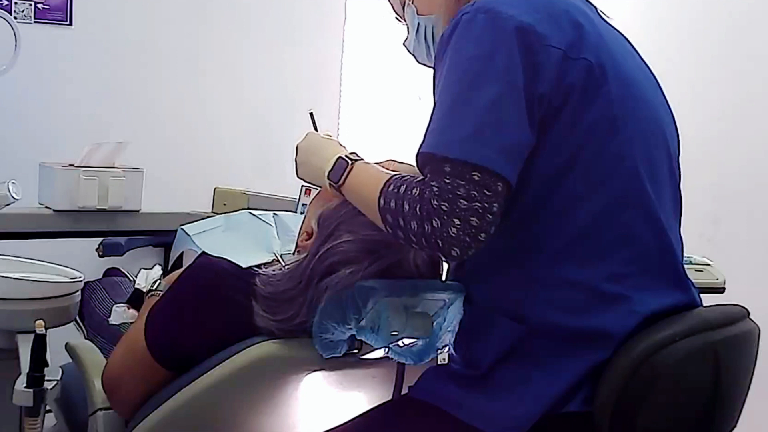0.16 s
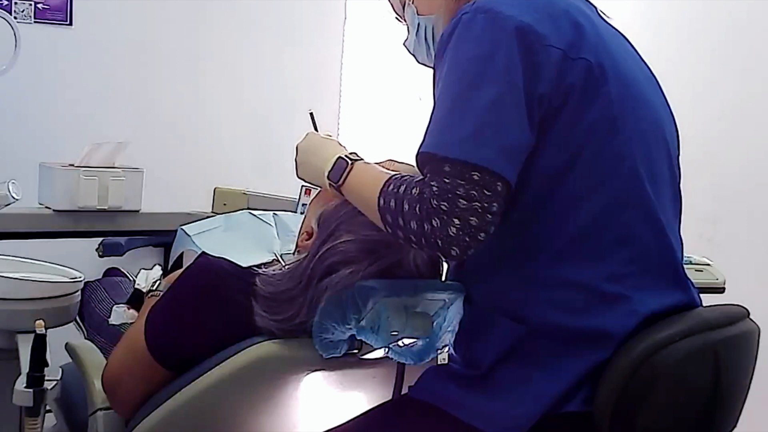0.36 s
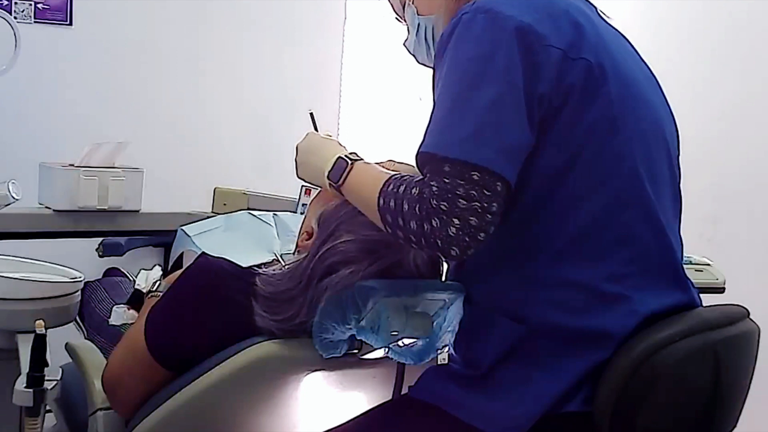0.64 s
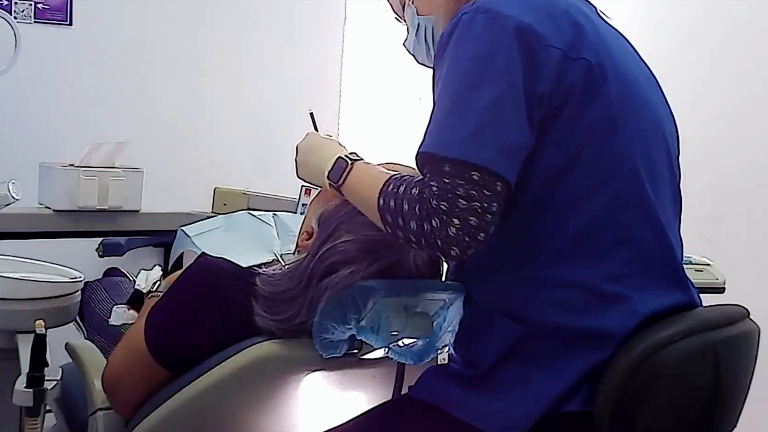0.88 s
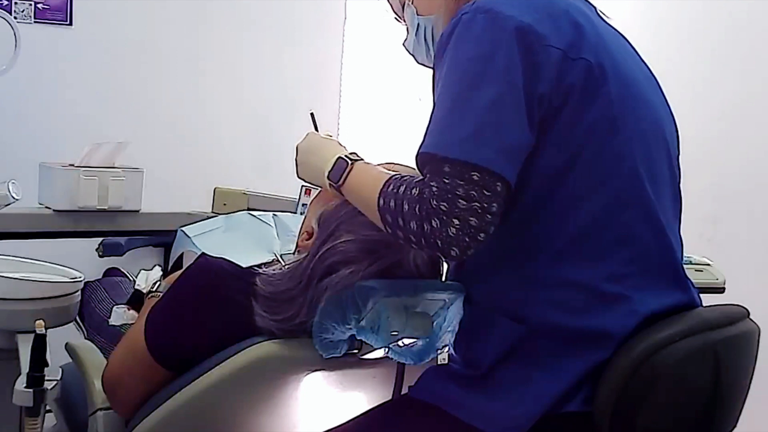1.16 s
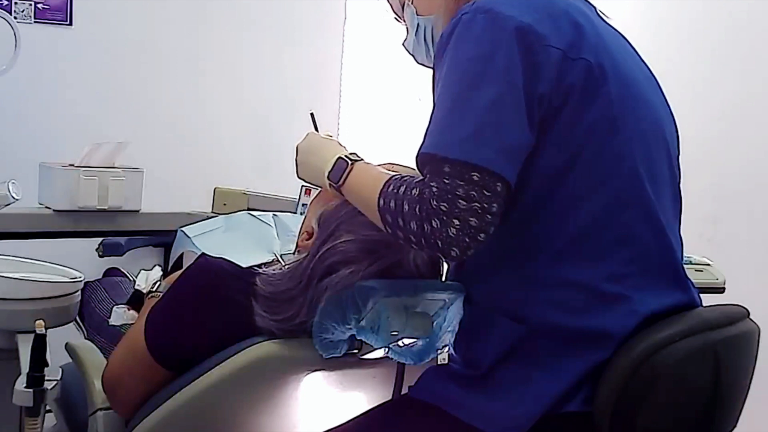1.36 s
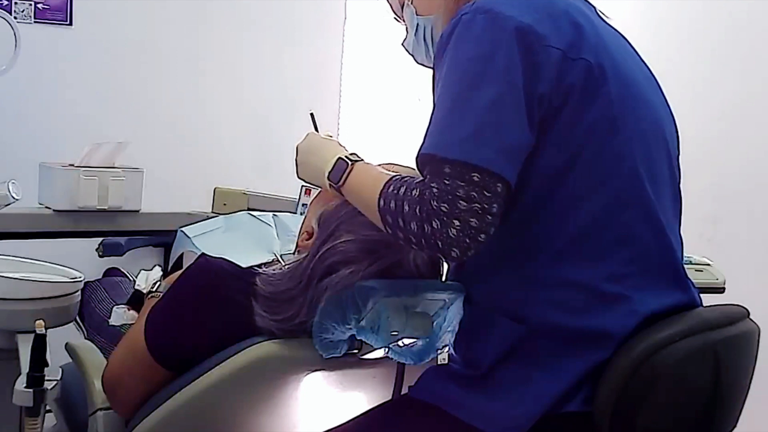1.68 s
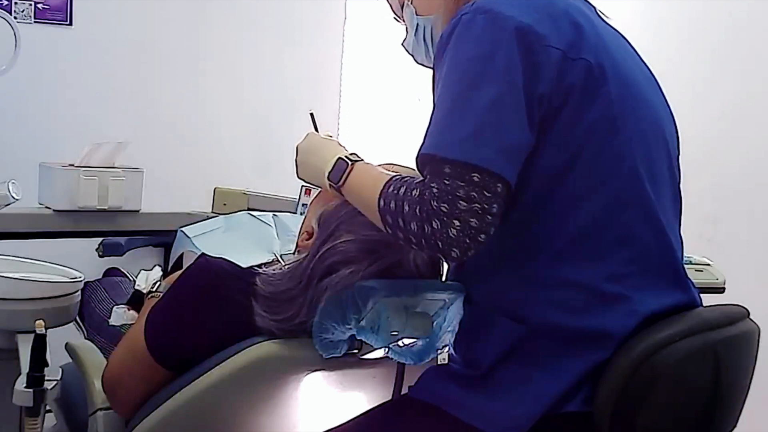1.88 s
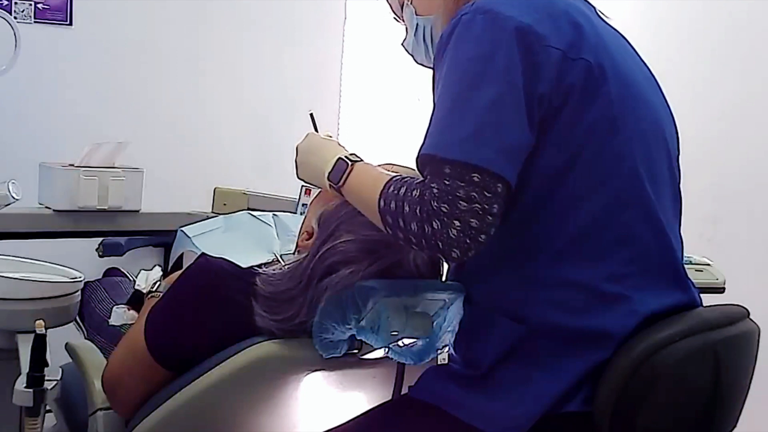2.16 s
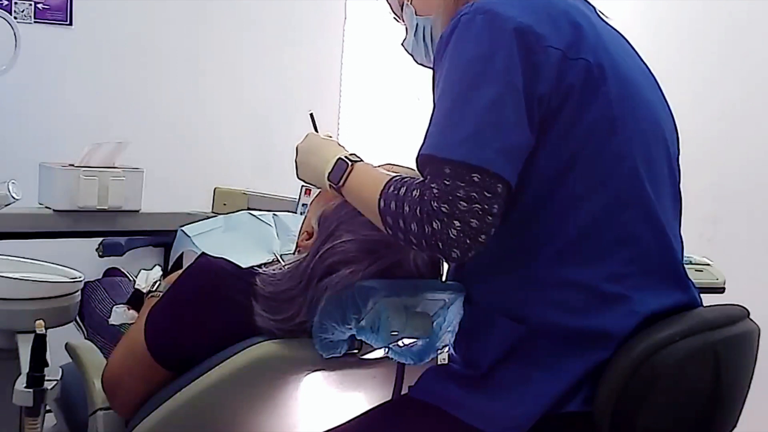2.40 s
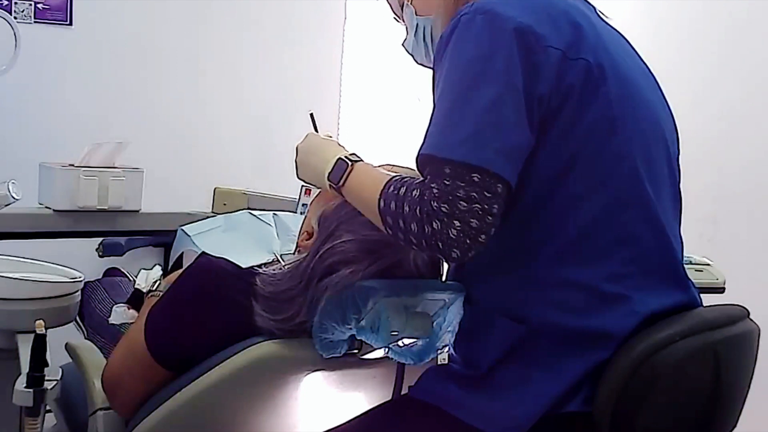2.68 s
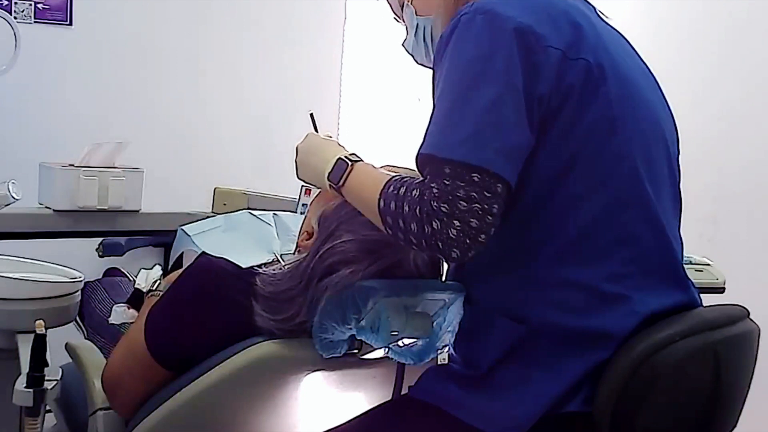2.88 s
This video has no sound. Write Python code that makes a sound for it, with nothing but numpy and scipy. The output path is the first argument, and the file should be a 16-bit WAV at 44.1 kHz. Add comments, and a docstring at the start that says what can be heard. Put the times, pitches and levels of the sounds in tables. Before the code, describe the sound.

Dental suction draws air and spray with a bright hiss, whistling at first and surging briefly. Then a scaler's steely sizzling comes in quick bursts, with faint wet slurps. Equipment hums softly in the small treatment room.

```python
"""A suction tube hisses on air and spray, with a few breathy whistles: a dental cleaning in a small,
quiet clinic room. The open mouth colours the draught with a hollow, shifting resonance, and water
slurps into the tube. The powered scaler sizzles each time its wet steel tip touches a tooth.
Equipment hums underneath."""
import sys
import numpy as np
from scipy import signal
from scipy.fft import rfft, irfft, next_fast_len
from scipy.io import wavfile
from scipy.ndimage import uniform_filter1d, map_coordinates

SR = 44100
rng = np.random.default_rng(int(sys.argv[2]) if len(sys.argv) > 2 else 0)


def output_pcm(signal):
    """Save a mono or channel-first signal as 16-bit PCM at the path in sys.argv[1].

    Samples are clipped to [-1, 1] before scaling.
    """
    pcm = np.clip(np.atleast_2d(signal).T, -1, 1) * 32767
    wavfile.write(sys.argv[1], SR, np.round(pcm).astype(np.int16))


N = 134064


def amp(db):
    """Decibels to gain."""
    return 10 ** (np.asarray(db) / 20)


def unit(x):
    """Scale to rms 1."""
    return x / np.sqrt(np.mean(x ** 2) + 1e-20)


def along(points, hz):
    """Read a curve of (Hz, value) points on a log frequency axis."""
    freqs, values = np.transpose(points)
    return np.interp(np.log(hz + 1), np.log(freqs + 1), values)


def curves(rows):
    """One value per sample for each column after the time."""
    times, *columns = np.transpose(rows)
    return [np.interp(np.arange(N) / SR, times, column) for column in columns]


def wobble(rate):
    """A smooth random curve, rate knots a second."""
    knots = rng.standard_normal(int(N * rate / SR) + 4)
    return map_coordinates(knots, [np.arange(N) * rate / SR])


def filtered(x, response):
    """Shape x with a gain that depends on frequency."""
    size = next_fast_len(N + SR // 2)
    return irfft(rfft(x, size) * response(np.fft.rfftfreq(size, 1 / SR)), size)[..., :N]


def coloured(x, spectrum):
    """x through an EQ curve of (Hz, dB) points, at rms 1."""
    return unit(filtered(x, lambda hz: amp(along(spectrum, hz))))


def resonate(x, modes):
    """x through steep-sided (Hz, width, dB) resonances, at rms 1."""
    def gain(hz):
        return np.sqrt(sum(amp(db) ** 2 / (1 + 2 * ((hz - centre) / width) ** 2) ** 3
                           for centre, width, db in modes))
    return unit(filtered(x, gain))


def stereo_noise(alike):
    """White noise, partly shared between left and right."""
    mid, side = rng.standard_normal((2, N))
    angle = np.arccos(np.clip(alike, -1, 1)) / 2
    mid, side = np.cos(angle) * mid, np.sin(angle) * side
    return np.array([mid + side, mid - side])


def pan(left_db):
    """Gains of the two sides for a left-minus-right level."""
    return amp(np.array([[left_db], [-left_db]]) / 2)


def impacts(per_s, scatter_db):
    """Tiny impacts at random times and of random size."""
    hits = rng.random(N) < per_s / SR
    return unit(hits * rng.standard_normal(N) * amp(scatter_db * rng.standard_normal(N)))


def strokes(rows, attack_s, release_s):
    """Attack, hold and release for each (start, length, dB) row."""
    t = np.arange(N) / SR
    power = np.zeros(N)
    for start, length, db in rows:
        attack = np.clip((t - start) / attack_s, 0, 1)
        release = np.exp(-np.maximum(t - start - length, 0) / release_s)
        power += (amp(db) * attack * release) ** 2
    return np.sqrt(power)


def swells(rows):
    """A rounded rise and fall for each (peak time, rise, fall, dB) row."""
    t = np.arange(N) / SR
    power = np.zeros(N)
    for peak, rise, fall, db in rows:
        distance = (t - peak) / np.where(t < peak, rise, fall)
        power += (amp(db) / (1 + distance ** 2 / 2) ** 2) ** 2
    return np.sqrt(power)


def room(x, wet_db, t60_s=0.3):
    """Direct sound and the short answer of the walls, different on each side."""
    t = np.arange(SR // 3) / SR
    tail = rng.standard_normal((2, len(t))) * amp(-60 * t / t60_s)
    wet = signal.fftconvolve(x[None], tail / np.linalg.norm(tail[0]), axes=1)[:, :N]
    return (x + amp(wet_db) * wet) / np.hypot(1, amp(wet_db))


def turbulence(wet_db, diffuse_db):
    """Rushing air from one spot, combed by the walls, plus a diffuse share."""
    return unit(room(rng.standard_normal(N), wet_db) + amp(diffuse_db) * stereo_noise(alike=0))


# Bass-heavy room tone. Each row: frequency in Hz, EQ gain in dB.
ROOM_TONE_EQ = [(10, 1), (30, 0.5), (46, 6), (65, 2), (100, -7), (170, -13), (330, -16.5), (600, -22),
                (1200, -25), (2300, -27), (6000, -31.5), (15000, -52)]
# Its stereo image. Each row: frequency in Hz, left-right likeness from 0 (wide) to 1 (mono).
ROOM_ALIKE = [(50, 1), (90, 0.6), (170, 0.19), (400, 0.57), (1000, 0), (3000, 0)]
# Equipment hum. Each row: pitch in Hz, level in dB.
HUM_TONES = [(48.3, -61.5), (398.4, -85)]


def equipment():
    """A wavering low hum in the steady rumble and air of the room."""
    def mid_side_gains(hz):
        angle = np.arccos(np.clip(along(ROOM_ALIKE, hz), -1, 1)) / 2
        return np.array([np.cos(angle), np.sin(angle)])
    mid, side = filtered(rng.standard_normal((2, N)), mid_side_gains)
    air = amp(-56) * coloured(np.array([mid + side, mid - side]), ROOM_TONE_EQ)
    t = np.arange(N) / SR
    hum = sum(amp(db + 1.8 * wobble(9.25)) * unit(np.sin(2 * np.pi * hz * t + 0.58 * wobble(6.4)))
              for hz, db in HUM_TONES)
    return air * pan(left_db=-0.45) + hum * pan(left_db=8.5)


# A late low swell. Each row: start in seconds, length in seconds, level in dB.
RUMBLE_CUES = [(2.8, 0.32, -58.5)]
# Its dark colour. Each row: frequency in Hz, EQ gain in dB.
RUMBLE_EQ = [(40, -21), (70, 5), (100, -5), (140, -5), (200, -23), (350, -18.5), (800, -53)]


def rumble():
    """A dull, low rumble rises softly in the room."""
    low_noise = coloured(stereo_noise(alike=0.82), RUMBLE_EQ)
    return low_noise * strokes(RUMBLE_CUES, attack_s=0.03, release_s=0.05)


def whine(hz=14425, width_hz=36, level_db=-69.5):
    """The scaler's thin, faint whine flutters inside the spray."""
    tone = resonate(turbulence(wet_db=-2, diffuse_db=-9), [(hz, width_hz, 0)])
    return tone * amp(level_db + 2 * wobble(17))


# Gulps of water. Each row: peak time, rise and fall in seconds, peak level in dB.
SLURPS = [(.53, 0.043, 0.05, -69), (.72, 0.043, 0.042, -67.5), (2.53, 0.055, 0.063, -61.5),
          (2.93, 0.023, 0.037, -62), (3.01, 0.032, 0.044, -60)]
# Their wet ring. Each row: centre and width in Hz, gain in dB.
SLURP_MODES = [(2950, 490, 6), (3270, 430, 8.5), (4360, 2400, -0.5)]


def slurps():
    """Bubbles burst at the mouth of the tube as it meets water."""
    bubbles = room(impacts(per_s=1800, scatter_db=-1), wet_db=4.5)
    return resonate(bubbles, SLURP_MODES) * swells(SLURPS) * pan(left_db=-4.5)


# Thin, high squeals. Each row: start and length in seconds, pitch and width in Hz, level in dB.
SQUEALS = [(0, 0.063, 14450, 110, -51.5), (0.145, 0.37, 10400, 350, -59.5), (.58, 0.19, 14000, 600, -59),
           (0.967, 0.2, 14130, 55, -64), (0.985, 0.23, 9320, 260, -59), (1.087, 0.21, 15500, 110, -60.5),
           (1.1, 0.12, 13250, 120, -61.5), (1.283, .13, 14300, 600, -59), (1.388, .22, 9280, 219.8, -62),
           (1.45, 0.21, 15500, 220, -64.5), (1.48, .16, 13420, 130, -67), (1.855, 0.23, 9270, 350, -68),
           (2.582, 0.084, 9460, 250, -63)]


def squeals():
    """Narrow, fluttering squeals come and go in the spray."""
    out = np.zeros((2, N))
    for start, length, hz, width, db in SQUEALS:
        band = resonate(turbulence(wet_db=3, diffuse_db=-14), [(hz, width, 0)])
        flutter = amp(2.4 * wobble(39.85))
        out += band * flutter * strokes([(start, length, db)], attack_s=0.02, release_s=0.021)
    return out * pan(left_db=0.5)


TUBE_NOTE_HZ = 1108
# Breathy whistles in the draught. Each row: start in seconds, length in seconds, level in dB.
WHISTLES = [(.045, 0.06, -59), (.165, 0.048, -62.5), (.275, 0.051, -56.5), (.395, 0.048, -57.5)]


def whistles(jitter_hz=10.7):
    """The tube's note breaks into short, rough whistles."""
    phase = 2 * np.pi * np.cumsum(TUBE_NOTE_HZ + jitter_hz * wobble(200)) / SR
    tone = unit(np.sin(phase) * amp(2.4 * wobble(189.7)))
    return tone * strokes(WHISTLES, attack_s=0.0099, release_s=0.029)


# Fader moves for the draught, before the surge and from the surge on.
# Each row: time in seconds, relative levels of the low and of the upper resonances in dB.
DRAUGHT_EARLY = [(0.0, -58.5, -56.5), (0.106, -64.5, -66), (0.16, -72, -74), (0.276, -63.5, -70),
                 (0.488, -68.5, -66.5), (0.598, -75.5, -93), (0.714, -82, -105), (0.724, -76, -88),
                 (0.785, -74, -68)]
DRAUGHT_LATE = [(0.81, -62.5, -58.5), (1.19, -66, -69), (1.25, -70, -72), (1.27, -70.5, -65.5),
                (1.95, -72.5, -69), (2.01, -84, -70.5), (2.04, -74, -66.5), (2.39, -79, -74),
                (2.52, -74.5, -70.5), (2.8, -76, -72.5), (3.0, -90, -67.5), (3.04, -79, -73)]
# The mouth's low resonance. Each row: time in seconds, centre and width in Hz.
MOUTH_SWEEP = [(0, 1061, 240), (.3, 1130, 230.1), (.55, 1174, 189.9), (.82, 1336, 125), (.97, 1371, 160),
               (1.15, 1410, 195.1), (1.3, 1298, 85), (1.55, 1245, 90.02), (1.75, 1193, 100),
               (1.92, 1230, 90.02), (2.2, 1210, 105), (2.68, 1260, 99.98), (3.04, 1277, 120)]
# Hollow upper resonances of mouth and tube. Each row: centre and width in Hz, gain in dB.
HOLLOW_MODES = [(3200, 140, -8), (3713, 336, -1), (4646, 300, -5), (5930, 85, -9)]


def mouth(gurgle_db=1.7, gurgle_per_s=110):
    """The draught gurgles in the cavity of the mouth, whose resonance shifts and narrows."""
    low_db, upper_db = curves(np.vstack([DRAUGHT_EARLY, DRAUGHT_LATE]))
    centre_hz, width_hz = curves(MOUTH_SWEEP)
    mean_width = width_hz.mean()
    band = filtered(rng.standard_normal((2, N)), lambda hz: 1 / (1 + (hz / mean_width) ** 2) ** 0.8)
    clock = np.cumsum(width_hz) / mean_width  # slower noise makes a narrower band
    cos_part, sin_part = [np.interp(clock, np.arange(N), noise) for noise in band]
    phase = 2 * np.pi * np.cumsum(centre_hz) / SR
    cavity = cos_part * np.cos(phase) + sin_part * np.sin(phase)
    gurgle = cavity * amp(gurgle_db * wobble(gurgle_per_s))
    low = unit(room(gurgle, wet_db=3)) * amp(low_db + 2.5)
    tube_note = resonate(turbulence(wet_db=-1.5, diffuse_db=-23), [(TUBE_NOTE_HZ, 25, 0)])
    flutter_db = 2 * wobble(170)
    hollow = resonate(turbulence(wet_db=14.5, diffuse_db=-20), HOLLOW_MODES)
    upper = hollow * amp(upper_db - 2 + flutter_db) * pan(left_db=-8.5)
    return low + tube_note * amp(low_db - 8.5) + upper


# Pulls of strong suction. Each row: peak time, rise and fall in seconds, peak level in dB.
SURGES = [(.86, 0.041, 0.058, -58.5), (1.1, 0.08, 0.11, -60)]
# Their broad colour. Each row: centre and width in Hz, gain in dB.
SURGE_MODES = [(795, 580, -12), (3520, 390, 6.5), (4260, 290, 3), (6170, 1500, 4)]


def surge():
    """The tube draws harder for a moment, with a broad rush."""
    rush = resonate(turbulence(wet_db=12, diffuse_db=-16), SURGE_MODES)
    return rush * swells(SURGES) * pan(left_db=-14.5)


# Opening jets of spray. Each row: peak time, rise and fall in seconds, peak level in dB.
JETS = [(.05, 0.12, 0.11, -55.5), (.3, 0.088, 0.12, -59.5)]
# Their bite. Each row: centre and width in Hz, gain in dB.
JET_MODES = [(3910, 170, 2), (4300, 330, -2.5), (4750, 110, -1.5), (5260, 100, -6), (5970, 200, -1.5),
             (9560, 420, 4.5)]


def jets():
    """Spray rushes into the tube with a biting edge."""
    spray = resonate(turbulence(wet_db=6, diffuse_db=-12), JET_MODES)
    return spray * swells(JETS) * pan(left_db=-9)


# Fader moves for the tube's hiss and the finest mist. Each row: time in seconds, relative level in dB.
HISS_FADER = [(0.0, -51), (0.07, -60.5), (0.38, -57.5), (0.61, -64), (0.79, -65.5), (0.81, -58),
              (0.94, -56.5), (1.08, -53.5), (1.3, -64), (1.49, -65.5), (1.62, -66), (2.29, -69),
              (2.62, -64), (2.71, -68), (2.85, -64.5), (2.87, -67), (2.94, -68), (3.0, -59.5), (3.04, -64)]
MIST_FADER = [(0.0, -54), (0.09, -58), (0.22, -63), (0.29, -55.5), (0.75, -55), (0.77, -60), (1.01, -54),
              (1.13, -62), (1.4, -59.5), (1.75, -59.5), (1.83, -63.5), (2.4, -64), (2.6, -61.5),
              (3.04, -62)]
# Bright hiss, and mist fizzing in the top treble. Each row: frequency in Hz, EQ gain in dB.
HISS_EQ = [(600, -14.5), (2400, -13.5), (3100, -7.5), (5200, -7), (6400, -2.5), (7100, 3.5), (7900, 9),
           (8700, 4.5), (10300, 3.5), (12000, 4), (13200, -5.5), (15000, -11)]
MIST_EQ = [(10000, -45), (12300, -10), (13400, 1.5), (14300, 0.5), (14900, -3), (15600, -10), (16000, -28)]


def suction():
    """Air rushes into the tube with bursting droplets, and a fine mist above it."""
    flow_db, = curves(HISS_FADER)
    mist_db, = curves(MIST_FADER)
    flow_db = uniform_filter1d(flow_db, size=SR // 25, mode="nearest")
    air = turbulence(wet_db=10.5, diffuse_db=-10)
    droplets = amp(-12) * room(impacts(per_s=900, scatter_db=0.5), wet_db=12)
    hiss = coloured(air + droplets, HISS_EQ) * amp(flow_db + 7.5 + 0.45 * wobble(70))
    mist = coloured(turbulence(wet_db=8, diffuse_db=-15), MIST_EQ) * amp(mist_db + 1.3 * wobble(50))
    return hiss + mist * pan(left_db=1.8)


# The tip presses on a tooth and eases off.
# Each row: peak time, rise and fall in seconds, peak level in dB.
TOOTH_CONTACTS = [(.25, 0.027, 0.041, -50.5), (1, 0.042, 0.025, -56), (1.105, 0.024, 0.038, -52),
                  (1.686, 0.013, 0.022, -49), (1.75, 0.054, 0.07, -54.5), (1.89, .025, 0.045, -58.5),
                  (2.05, 0.035, 0.035, -59.5), (2.16, 0.085, 0.063, -51.5), (2.357, 0.02, 0.06, -50.5),
                  (2.44, 0.065, 0.06, -59), (2.55, 0.067, 0.083, -48.5), (2.72, 0.065, 0.11, -62),
                  (2.828, 0.022, 0.043, -48.5), (2.93, 0.044, .04, -54), (2.995, 0.033, 0.065, -45.5)]
# The steely ring of tip and tooth. Each row: centre and width in Hz, gain in dB.
TIP_MODES = [(7130, 260, -6), (7720, 130, 0.5), (7840, 430, -3.5), (7900, 110, 0.5), (8330, 340, -7.5),
             (9200, 270, -17.5), (12000, 300, -11), (12500, 700, -12.5)]


def scaler(pitch_wander=0.004):
    """The vibrating tip chatters on wet enamel; its ring wanders as the pressure changes."""
    chatter = unit(impacts(per_s=2700, scatter_db=5) * amp(-2 * wobble(260)))
    clock = np.cumsum(1 + pitch_wander * wobble(12))  # uneven speed bends the pitch
    ring = resonate(room(chatter, wet_db=13.5), TIP_MODES)
    wandering = np.array([map_coordinates(side, [clock], mode="mirror") for side in ring])
    return unit(wandering * amp(wobble(180))) * swells(TOOTH_CONTACTS)


def scene():
    """Suction, mouth, scaler and room, mixed in stereo."""
    tube = suction() + jets() + surge() + squeals() + slurps()
    return tube + mouth() + whistles() + scaler() + whine() + equipment() + rumble()


def record(dry, top_hz=15750):
    """A sharp low-pass cuts off the very top of the treble."""
    return filtered(dry, lambda hz: hz < top_hz)


dry = scene()
out = record(dry)
output_pcm(out)
```